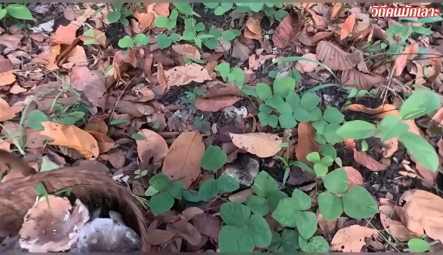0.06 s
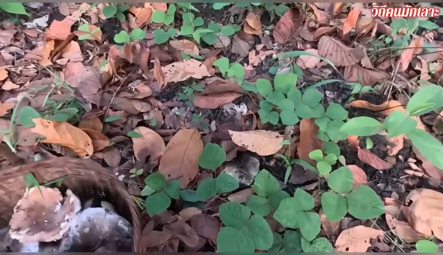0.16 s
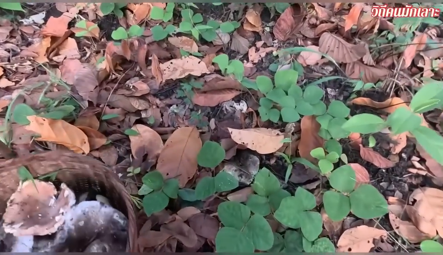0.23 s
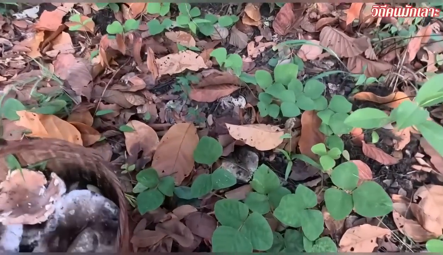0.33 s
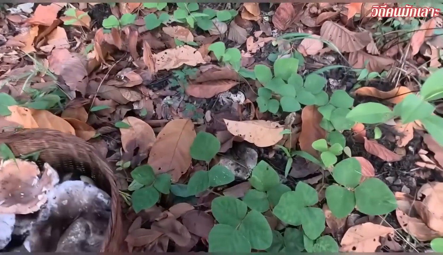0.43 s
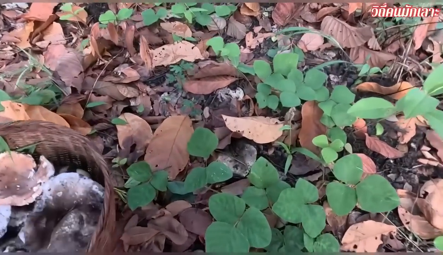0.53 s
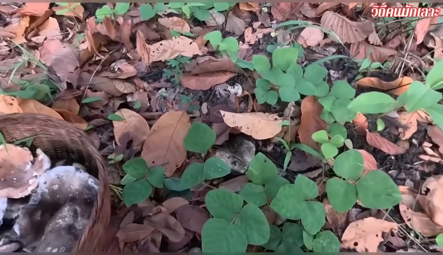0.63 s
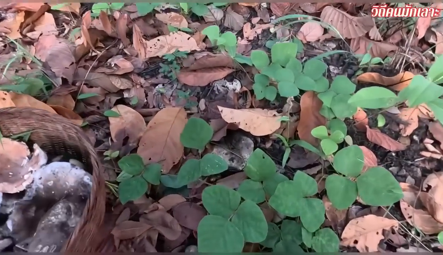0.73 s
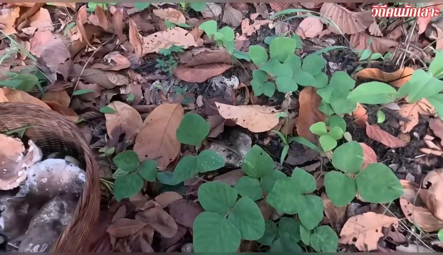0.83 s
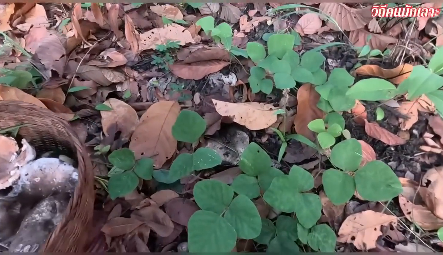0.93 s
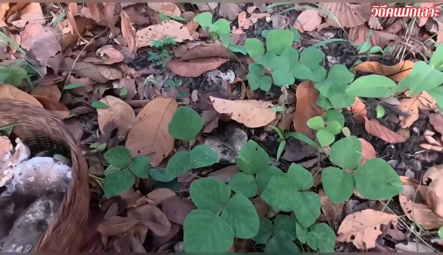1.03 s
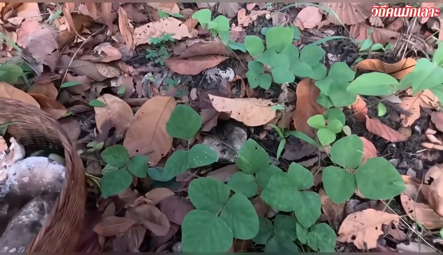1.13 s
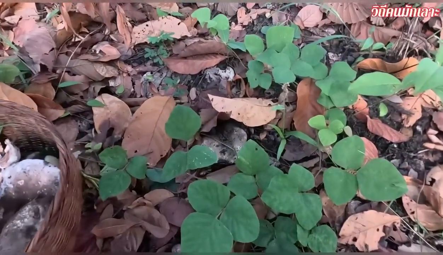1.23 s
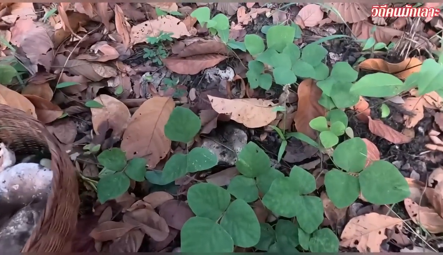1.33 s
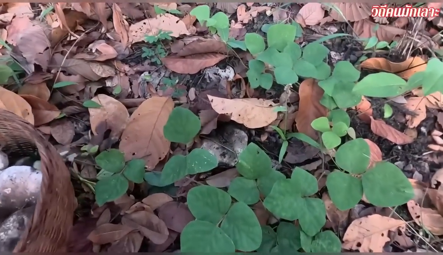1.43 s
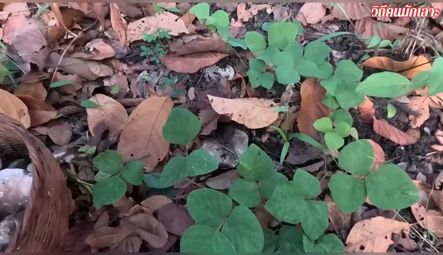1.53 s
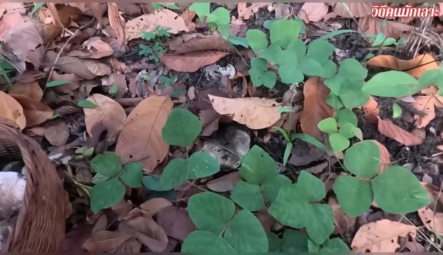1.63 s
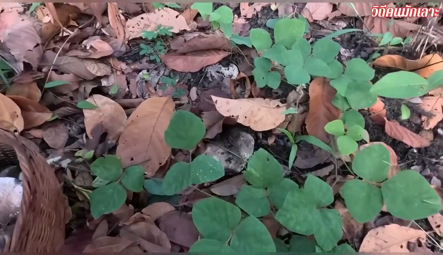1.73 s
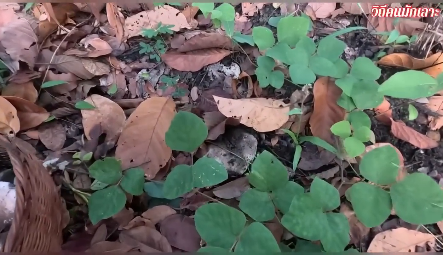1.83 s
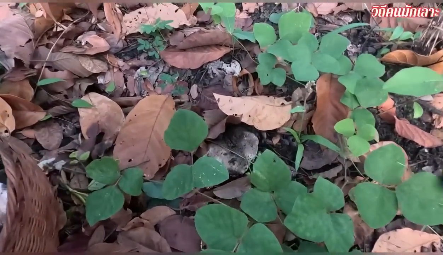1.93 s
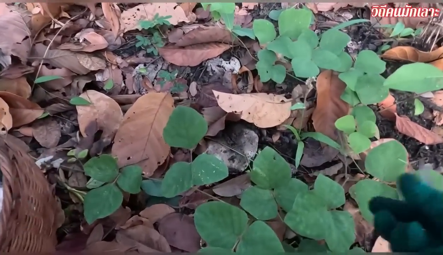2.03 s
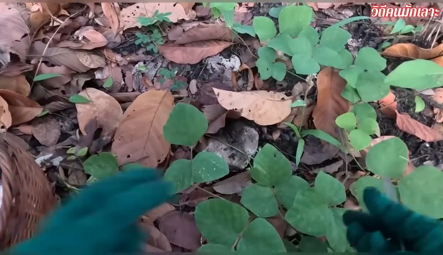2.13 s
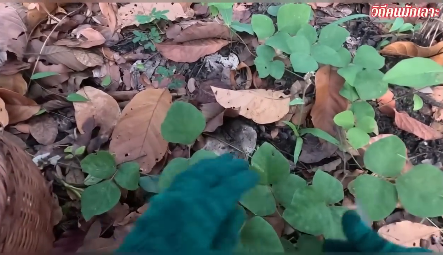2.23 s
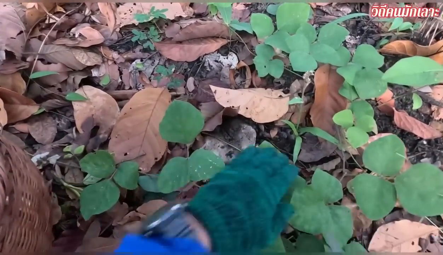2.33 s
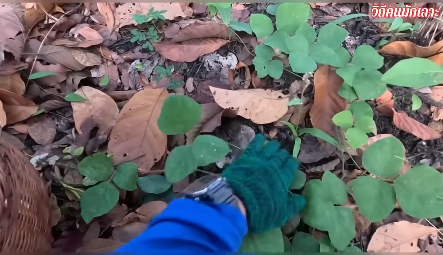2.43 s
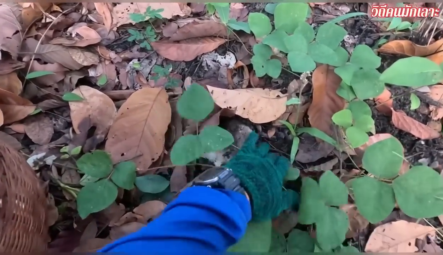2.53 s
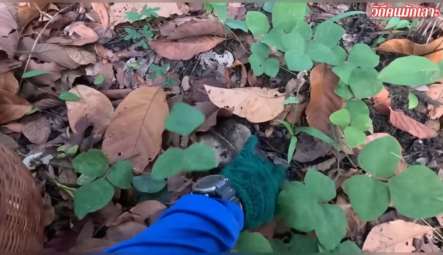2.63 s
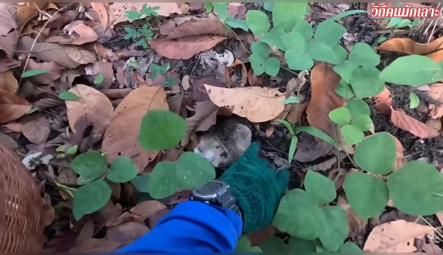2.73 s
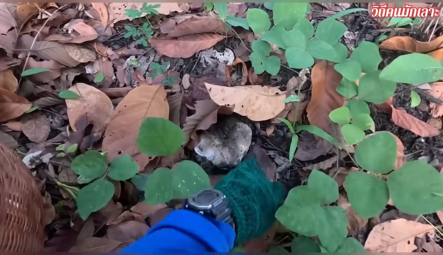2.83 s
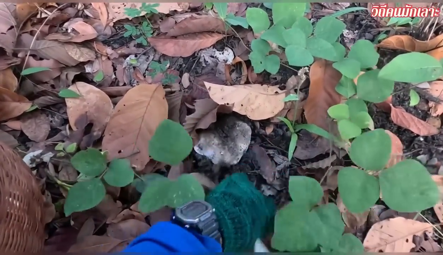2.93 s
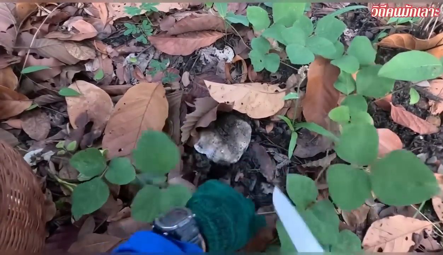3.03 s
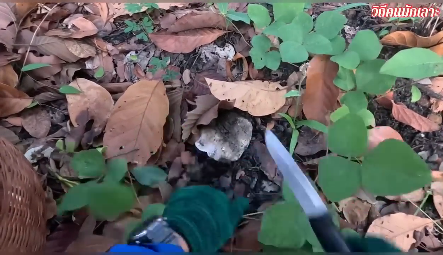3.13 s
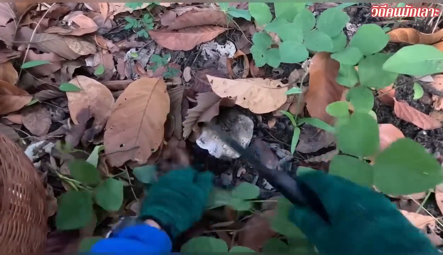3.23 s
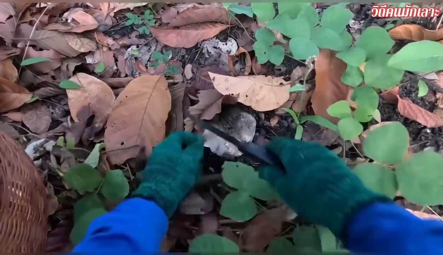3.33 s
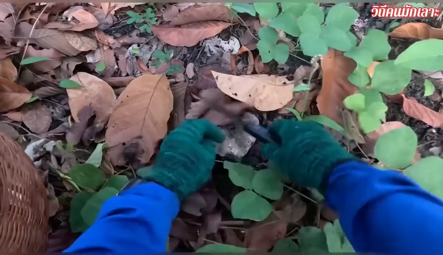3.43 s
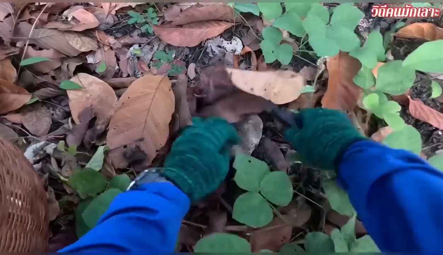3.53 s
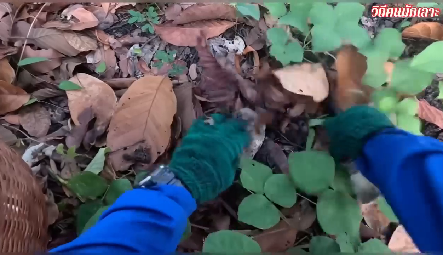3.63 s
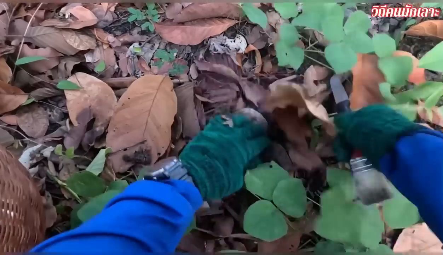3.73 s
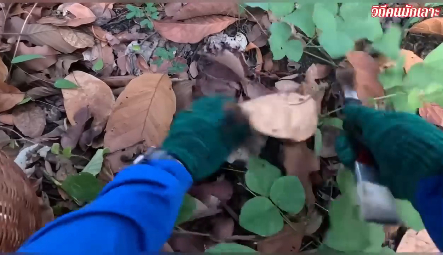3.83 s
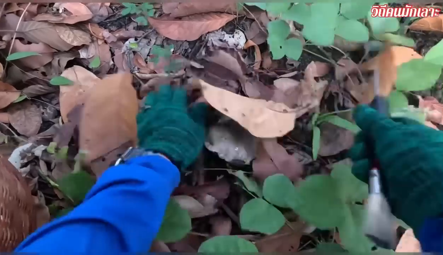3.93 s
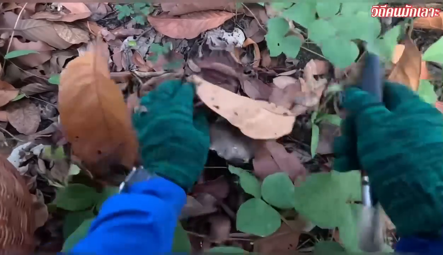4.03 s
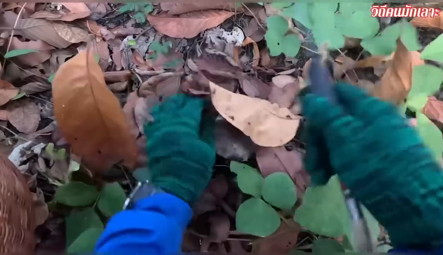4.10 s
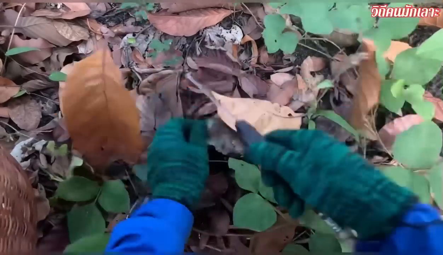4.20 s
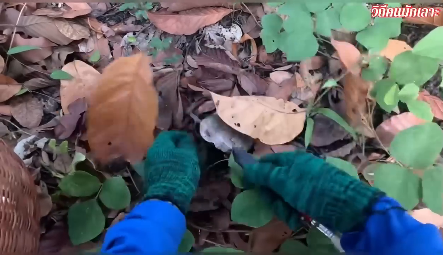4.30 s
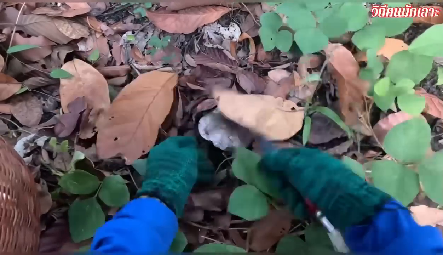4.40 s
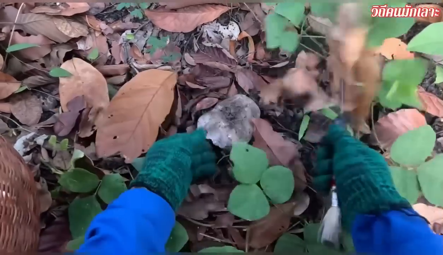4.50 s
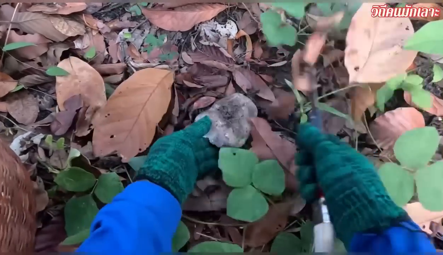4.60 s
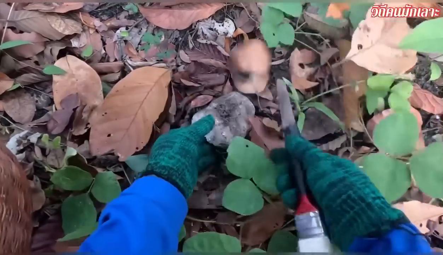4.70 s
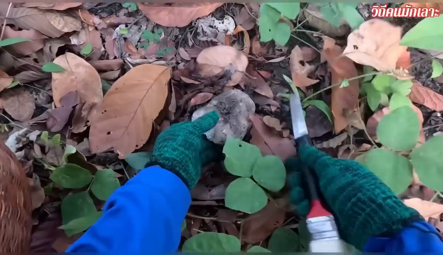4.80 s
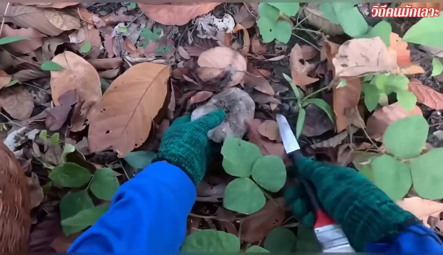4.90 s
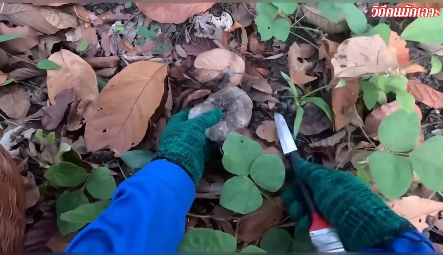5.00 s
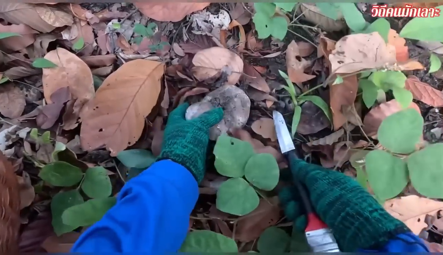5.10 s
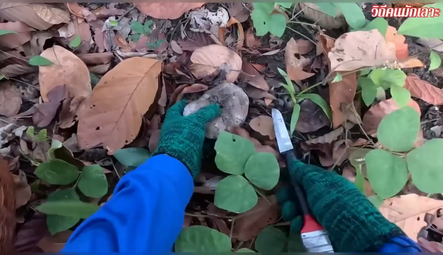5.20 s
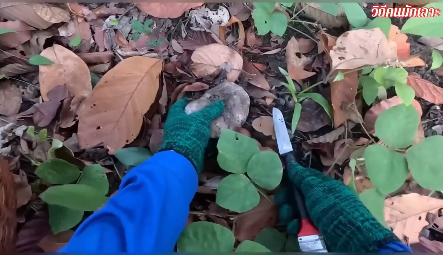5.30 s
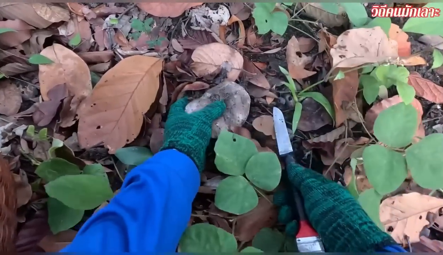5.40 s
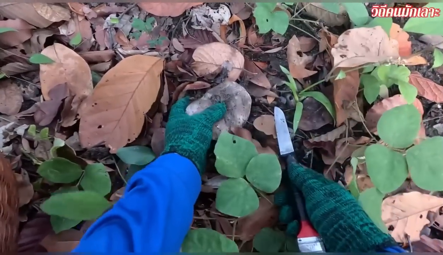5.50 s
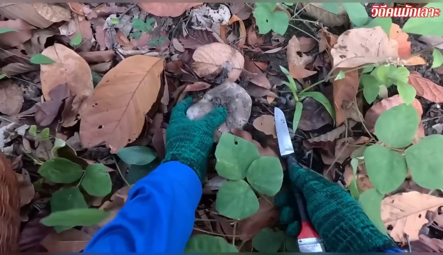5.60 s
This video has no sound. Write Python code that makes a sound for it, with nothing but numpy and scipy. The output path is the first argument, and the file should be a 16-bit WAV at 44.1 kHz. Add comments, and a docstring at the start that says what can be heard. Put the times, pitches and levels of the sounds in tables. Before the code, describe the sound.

Outdoors among dry leaf litter, heard close and fairly narrow in front. Leaves crunch at once, then calm, with small snaps and soft knocks on stems. Digging hands bring dense, crisp crackling in clumps, short gritty scrapes and one strong cluster of breaks, then quickly ease off. Quiet, wide woodland hush, distant insects and low air rumble lie behind.

```python
"""Dry leaf litter crackles in clumps as it is pushed about, with single leaves snapping close by.
The crackle is built from thousands of tiny ringing breaks and noise; each snap is a short tear and ring.
Stems and soil give dull knocks made of fading tones, and a knife scrapes the ground in bursts of grit.
Behind it, shaped noise makes the forest hush, the hiss of insects and the rumble of moving air.
"""
import sys
import numpy as np
from scipy import signal
from scipy.fft import rfft, irfft, next_fast_len
from scipy.io import wavfile
from scipy.ndimage import uniform_filter1d, map_coordinates

SR = 44100
rng = np.random.default_rng(int(sys.argv[2]) if len(sys.argv) > 2 else 0)


def transcribe(u):
    """Save the signal u as a 16-bit wav file named by the first command-line argument.

    u: samples, shape (n,) or (channels, n), limited to [-1, 1]; the rate is SR.
    q: integer samples, one column per channel.
    """
    v = np.clip(np.atleast_2d(u).T, -1, 1)
    q = np.round(v * 32767).astype(np.int16)
    wavfile.write(sys.argv[1], SR, q)


N = 249209  # length in samples

# Rumble of air on the microphones. Each row: time in seconds, level in dB.
AIR_LEVELS = [(0, -48.5), (1.4, -45.5), (2.4, -53), (5.65, -62)]
# Tone colours of the air and of the forest hush. Each row: pitch in Hz, relative strength in dB.
AIR_COLOUR = [(8, -5.5), (35, -10), (75, -23.5), (200, -38.5), (400, -82)]
FOREST_COLOUR = [(71, -57), (120, 7.5), (332, 1.5), (899, -25), (1320, -12), (4570, -1.5), (5610, 5),
                 (6330, -63), (7450, -5.5), (9510, -26.5), (12100, -26)]
# The forest is all around. Each row: pitch in Hz, gain in dB on the side (left-right difference).
FOREST_WIDTH_GAINS = [(200, 3.5), (1000, 23.5), (3500, 1), (6000, -9)]
# Narrow band of distant insects. Each row: pitch in Hz, relative strength in dB.
INSECT_COLOUR = [(3500, -60), (4800, -16), (5500, -10), (6100, -16), (8000, -50), (10000, -90)]

# Pushes into the litter, first by feet, then by hands. Each row: start in seconds, hold in seconds,
# leaf crackle in dB, crunch of the layer below in dB (both before the final trims in rustle).
PUSHES = [(0.005, 0.16, -45.5, -46), (0.073, 0.014, -43.5, -52), (0.227, 0.0036, -48, -44),
          (0.598, 0.15, -61, -53.5), (0.657, 0.019, -50, -66), (0.886, 0.49, -61, -62.5),
          (1.213, 0.042, -52, -59.5), (1.306, 0.21, -63, -56), (1.459, 0.11, -52, -52),
          (1.76, 0.38, -65, -67.5), (2.32, 0.24, -56.5, -61.5), (2.434, 0.14, -52, -71),
          (2.632, 0.019, -43, -55.5), (2.727, 0.14, -51, -81), (2.876, 0.015, -47.5, -74),
          (2.917, 0.036, -42, -56), (2.971, 0.036, -38.5, -49.5), (3.059, 0.064, -38, -51),
          (3.18, 0.083, -36.5, -46), (3.322, 0.073, -38.5, -48), (3.458, 0.12, -39.5, -48.5),
          (3.57, 0.052, -32, -39.5), (3.636, 0.03, -30.5, -32), (3.688, 0.025, -29.5, -42),
          (3.742, 0.082, -41, -44), (3.867, 0.04, -36.5, -54), (3.929, 0.054, -31, -36),
          (4.061, 0.028, -37.5, -41.5), (4.148, 0.044, -40.5, -45.5), (4.311, 0.0079, -36.5, -39.5),
          (4.408, 0.06, -42, -55), (4.471, 0.0077, -25, -32.5), (4.511, 0.049, -26, -32.5),
          (4.578, 0.047, -39, -47), (4.736, 0.014, -42, -50), (4.846, 0.0035, -43.5, -51.5),
          (4.9, 0.11, -44.5, -54), (5.062, 0.012, -45.5, -50.5), (5.119, 0.069, -48, -56.5),
          (5.28, 0.15, -55.5, -65.5), (5.568, 0.09, -53, -78)]
# Colours of pressed leaves, lightly brushed leaves, the layer below, and ground being shoved.
# Each row: pitch in Hz, relative strength in dB.
PRESSED_COLOUR = [(410, -26.5), (700, -7), (839, -12.5), (943, -3.5), (1560, -9.5), (1900, -4),
                  (2160, -6.5), (3870, -5), (4700, -10), (7220, -6.5), (10100, -34), (12400, -28),
                  (15500, -75)]
BRUSHED_COLOUR = [(470, -29), (800, -7), (1200, 1.5), (3170, 2.5), (4480, -0.5), (7100, 1.5), (9800, -22.5),
                  (12100, -15.5), (15500, -42)]
CRUNCH_COLOUR = [(60, -61), (140, -11.5), (260, 5), (450, 3), (650, 2), (850, -10), (1300, -3), (3000, -70)]
SHOVE_COLOUR = [(25, -3), (65, -2.5), (100, -16), (170, -5.5), (300, -38)]

# Single leaves and stalks breaking. Each row: start in seconds, level in dB before the trim and filter
# in snaps, ring pitch in Hz, sharpness of the ring (Q, no unit).
LEAF_SNAPS = [(0.091, -32.5, 2200, 1.2), (0.1191, -33, 1400, 1), (0.1426, -32, 5950, 3.9),
              (0.181, -32, 2220, 0.42), (0.2396, -27.5, 3180, 0.14), (0.2795, -33.5, 4970, 1),
              (0.299, -38, 3330, 0.6), (0.55, -43.5, 1210, 1.4), (0.928, -35, 4280, 1.4),
              (1.059, -38.5, 5040, 2.2), (1.112, -36.5, 1160, 0.77), (1.1274, -36, 1530, 1.4),
              (1.3581, -34.5, 5400, 0.28), (1.5101, -33, 3160, 4), (1.5374, -39, 5500, 1.8),
              (1.5563, -32.5, 3770, 0.62), (1.5805, -34.5, 890, 1.8), (2.029, -41.5, 2980, 0.17),
              (2.0525, -41, 6000, 4.3), (2.294, -41.5, 3540, 0.44), (2.611, -40, 1700, 1.5),
              (2.6355, -35, 1680, 0.69), (3.2391, -24, 3360, 1.2), (3.431, -29.5, 5940, 3.1),
              (3.4492, -24.5, 2650, 0.44), (3.4718, -30, 2280, 0.79), (3.5625, -27.5, 2020, 0.61),
              (3.6553, -31, 1590, 0.35), (3.677, -25, 1000, 1.1), (3.72, -23, 2298, 1.3),
              (3.7434, -24, 1670, 0.6), (3.9319, -33, 1560, 3.1), (4.0094, -28, 2050, 2.9),
              (4.1368, -30, 2970, 0.8), (4.2233, -33.5, 2020, 2.6), (4.312, -35, 1430, 1.7),
              (4.3183, -23.5, 5000, 0.55), (4.4613, -24.5, 2150, 3.2), (4.475, -18.5, 1860, 2.6),
              (4.5171, -16, 6300, 1.7), (4.531, -18, 1000, 0.43), (4.554, -17.5, 2430, 2.3),
              (4.5555, -21.5, 1000, 8.1), (4.599, -18.5, 2440, 5.8), (4.6085, -20.5, 955, 9.6),
              (4.742, -32, 3470, 0.76), (4.751, -28.5, 3090, 6.5), (4.854, -26.5, 1285, 12),
              (5.079, -23.5, 1860, 2), (5.3831, -38, 2470, 3.6)]
# Filter over all snaps. Each row: pitch in Hz, gain in dB.
SNAP_COLOUR = [(150, 6.0), (800, -4.0), (7600, -7.5), (8800, -29), (12500, -31), (15000, -48)]

# Dull knocks on stems and soil. Each row: start in seconds, level in dB before fading,
# pitch in Hz, time to fade by 60 dB in seconds.
STEM_KNOCKS = [(0.119, -28, 305, 0.046), (.119, -23.5, 630, 0.023), (0.303, -34.5, 327, 0.059),
               (0.561, -36.5, 380, 0.024), (0.627, -34.5, 148, 0.033), (1.111, -41, 296, 0.05),
               (1.58, -33.5, 330, 0.047), (1.581, -23, 850, 0.015), (1.788, -21, 380, 0.02),
               (1.968, -30, 474, 0.017), (2.56, -41, 494, 0.04), (3.637, -27.5, 362.5, 0.17),
               (3.678, -27, 157, 0.035), (3.857, -32, 171, 0.09), (4.469, -21.5, 420, 0.07),
               (4.519, -24.5, 227, 0.11), (4.532, -15.5, 146, 0.035), (4.54, -32.5, 65, 0.3)]
# Colour of soil crumbling under a knock. Each row: pitch in Hz, relative strength in dB.
CRUMBLE_COLOUR = [(100, -5.5), (350, -2.5), (1000, -19.5), (7000, -17.5), (10000, -41)]

# Short scrapes through the soil. Each row: start in seconds, level in dB, length in seconds.
SOIL_SCRAPES = [(4.059, -35.5, 0.05), (4.587, -41.5, 0.096), (4.839, -35, 0.035), (5.058, -34.5, 0.03),
                (5.548, -46, 0.1)]
# Colour of the scraped grit. Each row: pitch in Hz, relative strength in dB.
SCRAPE_COLOUR = [(500, -37), (800, -28), (980, -6), (1250, -11), (1700, -18.5), (4000, -23), (9000, -87)]

# Likeness of left and right for equally strong mid and side. Each row: pitch in Hz, likeness (1 = same).
EAR_LIKENESS = [(300, 0.95), (1700, 0.93), (2700, 0.69), (4200, 0.94), (7000, 1), (12000, 0.057)]
# Steady tilt between the sides. Each row: pitch in Hz, left minus right in dB.
SIDE_TILT = [(250, -0.1), (700, -0.4), (4000, 0.3), (10000, 2)]
# Response of the microphones. Each row: pitch in Hz, gain in dB.
MICROPHONE_GAINS = [(6500, -3), (9000, 2.5), (15000, -4)]

TOP_HZ = 15300  # nothing is kept from here up
# Time to rise, or settle, by 20 dB: a base in seconds plus a share of the hold, so long pushes start gently
ATTACK_S, ATTACK_SHARE = 0.01, 0.64
SETTLE_S, SETTLE_SHARE = 0.085, 0.48
STIR_DB, STIR_CRUNCH_DB = -66, -76.5  # the litter is never quite still (before the trims in rustle)
LEAF_SIDE_DB = -4.5  # the hands work straight ahead, so their crackle is narrow
# Stray snaps: level at rest (before the trim in snaps), its spread, middle pitch and its spread
TICK_DB, TICK_SPREAD_DB, TICK_HZ, TICK_OCTAVES = -55, 3.5, 3900, 0.55
TICK_FOLLOW = 0.46  # dB of tick level per dB of rustle above the stir
TEAR_S, CLICK = 0.00051, 2.13  # longest tear in seconds; height of the click that starts each snap
GRIT_DB, GRIT_T60 = -19, 0.12  # crumbling soil: dB against its knock, seconds to fade by 60 dB
HAND_LEAN = 0.016  # hands sit a little to the right: dB off left and onto right per dB above the stir


def amp(db):
    """Turn decibels into a gain."""
    return 10 ** (np.asarray(db) / 20)


def unit(x):
    """Scale x to an average (rms) level of 1."""
    return x / np.sqrt(np.mean(x ** 2) + 1e-20)


def along(points, hz):
    """Read (Hz, value) points at any pitch, joined on a log pitch scale."""
    f, v = np.transpose(points)
    return np.interp(np.log(hz + 1), np.log(f + 1), v)


def curves(rows):
    """Give one value per sample for each column after the time."""
    s, *cols = np.transpose(rows)
    return [np.interp(np.arange(N) / SR, s, c) for c in cols]


def wobble(rate):
    """Draw a random curve: straight lines between `rate` random points a second."""
    knots = rng.standard_normal(N // 20)
    return map_coordinates(knots, [np.arange(N) * rate / SR], order=1, mode="wrap")


def filtered(x, response):
    """Multiply the spectrum of x by a response that depends on pitch."""
    m = next_fast_len(N + SR // 2)
    return irfft(rfft(x, m) * response(np.fft.rfftfreq(m, 1 / SR)), m)[..., :N]


def coloured(x, spectrum):
    """Filter x to this colour without any sound ahead of its cause, so attacks stay sharp."""
    m = 2 * next_fast_len(N // 2 + SR // 4)
    gain = amp(along(spectrum, np.fft.rfftfreq(m, 1 / SR)))
    # folding the cepstrum (spectrum of the log spectrum) gives a minimum-phase filter
    cepstrum = irfft(np.log(gain + 1e-6))
    cepstrum[1:m // 2] *= 2
    cepstrum[m // 2 + 1:] = 0
    return irfft(rfft(x, m) * np.exp(rfft(cepstrum)), m)[..., :N]


def add(track, s, sound):
    """Mix a sound into a track at time s in seconds."""
    part = track[..., max(round(s * SR), 0):][..., :sound.shape[-1]]
    part += sound[..., :part.shape[-1]]


def noise():
    """Make white noise for the mid (shared) and the side (left-right difference)."""
    return rng.standard_normal((2, N))


def patchy(x, depth_db):
    """Each leaf that bends has its own colour: random gains that change over pitch and time."""
    z = signal.stft(x, nperseg=256)[2]
    field = rng.standard_normal(z.shape[1:])
    field = uniform_filter1d(field, size=5, axis=0)  # blur over pitch
    field = uniform_filter1d(field, size=6, axis=1)  # blur over time
    return signal.istft(z * amp(depth_db * unit(field)), nperseg=256)[1][:, :N]


def fractures(count, spread_db, cycles, ring):
    """Scatter tiny breaks over mid and side, each a click that rings its own scrap of leaf."""
    when, pitch, size, place, sign = rng.random((count, 5)).T[:, :, None]
    n = np.arange(80)  # samples in one break
    hz = 900 * 9 ** pitch  # 900 to 8100 Hz
    turns = hz * n / SR
    tone = np.exp(-turns / cycles) * np.sin(2 * np.pi * turns)
    grain = ring * np.sqrt(hz / SR) * tone + (n == 0)
    # most breaks are tiny, a few are large
    grain = grain * np.sign(sign - .5) * amp(spread_db * np.minimum(-np.log(size), 4))
    at = ((when * N).astype(int) + n).ravel()
    streams = [np.bincount(at, (grain * g).ravel(), N)[:N] for g in (1, place - .5)]
    return np.array([unit(stream) for stream in streams])


def background():
    """Random noise is shaped into a wide forest hush, a flickering insect band and low air rumble."""
    hush = amp(-60.0) * unit(coloured(noise(), FOREST_COLOUR))
    hush[1] = filtered(hush[1], lambda hz: amp(along(FOREST_WIDTH_GAINS, hz)))
    chorus = unit(coloured(noise(), INSECT_COLOUR))
    flutter = amp(2.5 * wobble(30))
    insects = amp(-62.0) * flutter * chorus
    air = amp(curves(AIR_LEVELS)[0]) * unit(coloured(noise(), AIR_COLOUR))
    return hush + insects + air


def effort():
    """Each push rises, holds and settles; the power of all pushes adds to a stir that comes and goes."""
    start, hold, leaf_db, crunch_db = np.transpose(PUSHES)[:, :, None]
    t = np.arange(0, N, 32) / SR  # one step every 32 samples
    early = np.maximum(start - t, 0) / (ATTACK_S + ATTACK_SHARE * hold)
    late = np.maximum(t - start - hold, 0) / (SETTLE_S + SETTLE_SHARE * hold)
    shape = -20 * (early + late)
    lull_db = 3 * wobble(12)[::32]

    def total(db, rest_db):
        """Add the power of the pushes and the stir, in dB."""
        pushing = np.sum(amp(db + shape) ** 2, axis=0)
        return 10 * np.log10(pushing + amp(rest_db + lull_db) ** 2)

    leaf_total, crunch_total = total(leaf_db, STIR_DB), total(crunch_db, STIR_CRUNCH_DB)
    return curves(np.column_stack([t, leaf_total, crunch_total]))


def rustle(leaf_db, crunch_db):
    """Brushed leaves hiss finely, pressed ones break in clumps, and the layer below crunches and shoves."""
    clumps = 1.9 * wobble(190) + .8 * wobble(60)  # dB, shared so the layers swell together
    brush = fractures(count=16000, spread_db=3.2, cycles=1.8, ring=1.3) + .9 * noise()
    brushed = unit(coloured(patchy(amp(.55 * clumps) * brush, depth_db=2.5), BRUSHED_COLOUR))
    breaks = fractures(count=16000, spread_db=3.5, cycles=2.4, ring=1.3) + .5 * noise()
    pressed = unit(coloured(patchy(amp(clumps) * breaks, depth_db=2.2), PRESSED_COLOUR))
    # fade from brushed to pressed as the push goes from -43 to -33 dB
    firm = np.clip((leaf_db + 43.0) / 10, 0, 1)
    leaves = np.sqrt(1 - firm) * brushed + np.sqrt(firm) * pressed
    leaves[1] *= amp(LEAF_SIDE_DB)
    below = fractures(count=2500, spread_db=3.0, cycles=2.4, ring=0.034) + noise()
    crunch = unit(coloured(patchy(amp(clumps) * below, depth_db=2.5), CRUNCH_COLOUR))
    shove = amp(-5.5) * unit(coloured(noise(), SHOVE_COLOUR))
    return amp(leaf_db + 2.0) * leaves + amp(crunch_db - 4.5) * (crunch + shove)


def ticks(leaf_db, count):
    """Stray leaves spring back at random, more strongly during pushes; rows are like LEAF_SNAPS."""
    at = rng.integers(0, N, count)
    size, pitch = np.clip(rng.standard_normal((count, 2)).T, -2, 2)
    db = TICK_DB + TICK_FOLLOW * (leaf_db[at] - STIR_DB) + TICK_SPREAD_DB * size
    hz = TICK_HZ * 2 ** (TICK_OCTAVES * pitch)
    return list(zip(at / SR, db, hz, np.full(count, 2.5)))


def snaps(rows):
    """A break is a brief tear and a short ring of the leaf, followed by the stir of its neighbours."""
    out = np.zeros((2, N))
    t = np.arange(next_fast_len(SR // 16)) / SR
    hz_grid = np.fft.rfftfreq(len(t), 1 / SR)
    for s, db, hz, q in rows:
        tear = np.interp(db, [-42, -27], [0, TEAR_S])  # a harder break runs further through the leaf
        t60 = 0.008 + 12 / hz  # larger, lower pieces last longer
        after = np.maximum(t - tear, 0)
        neighbours = amp(-21 - 60 * t / .035)
        burst = rng.standard_normal((2, len(t))) * (amp(-60 * after / t60) + neighbours)
        burst[0, 0] += CLICK
        # the leaf rings at one pitch, over a little plain treble
        width = hz / q
        blade = 1j * hz_grid * width / (hz ** 2 - hz_grid ** 2 + 1j * hz_grid * width)
        treble = 0.12 * hz_grid / (hz_grid + 700)
        snap = irfft(rfft(burst) * (blade + treble), len(t))
        add(out, s, amp(db - 7.5) * unit(snap))
    return coloured(out, SNAP_COLOUR)


def knocks():
    """Soft blows ring briefly with a weaker mode just above, and crumble a little soil."""
    out, crumble = np.zeros((2, N)), np.zeros(N)
    t = np.arange(SR // 6) / SR
    for s, db, hz, t60 in STEM_KNOCKS:
        phase = 2 * np.pi * hz * t
        body = np.sin(phase) * amp(-60 * t / t60)
        upper = 0.16 * np.sin(1.06 * phase) * amp(-110 * t / t60)
        soft_start = 1 - np.exp(-t / 0.0021)
        add(out[0], s, amp(db) * (body + upper) * soft_start)
        add(crumble, s, amp(db + GRIT_DB - 60 * t / GRIT_T60))
    return out + crumble * unit(coloured(noise(), CRUMBLE_COLOUR))


def scrapes():
    """The blade drags through grit: many tiny breaks heard in short strokes."""
    stroke = np.zeros(N)
    for s, db, length in SOIL_SCRAPES:
        add(stroke, s, amp(db) * signal.windows.tukey(int(length * SR)))
    grit = fractures(count=9000, spread_db=1.5, cycles=1.5, ring=.8) * amp(2.2 * wobble(140))
    return stroke * unit(coloured(patchy(grit, depth_db=3.0), SCRAPE_COLOUR))


def scene():
    """Mix all sources for two close microphones; the balance drifts at random and with the pushes."""
    leaf_db, crunch_db = effort()
    both = background() + rustle(leaf_db, crunch_db)
    both += snaps(list(LEAF_SNAPS) + ticks(leaf_db, count=260))
    both += knocks() + scrapes()

    def spread(hz):
        """Share mid and side by pitch: the less alike the ears, the more side."""
        turn = np.arccos(np.clip(along(EAR_LIKENESS, hz), -1, 1)) / 2
        return np.array([np.cos(turn), np.sin(turn)])

    mid, side = filtered(both, spread)
    drift_db = .35 * wobble(5) - HAND_LEAN * (leaf_db - STIR_DB)
    ears = np.array([mid + side, mid - side]) * amp([drift_db, -drift_db])
    return filtered(ears, lambda hz: amp(np.outer([.5, -.5], along(SIDE_TILT, hz))))


def record(dry):
    """The microphones shape the treble and keep nothing from their band limit up."""
    return filtered(dry, lambda hz: amp(along(MICROPHONE_GAINS, hz)) * (hz < TOP_HZ))


dry = scene()
out = record(dry)
transcribe(out)
```